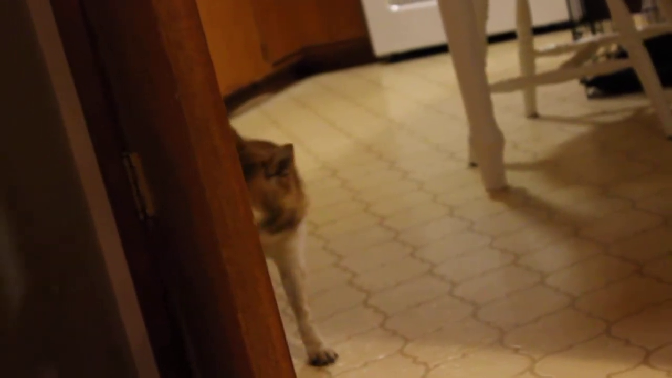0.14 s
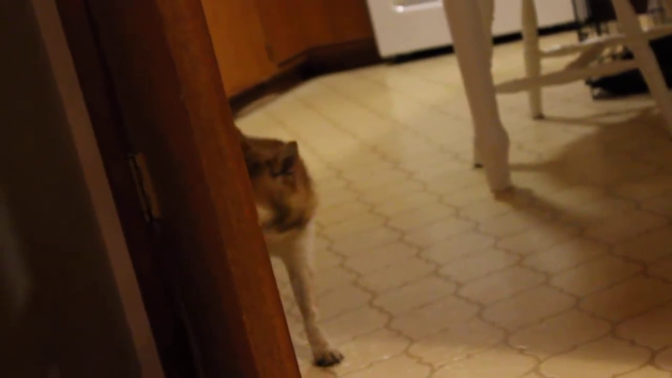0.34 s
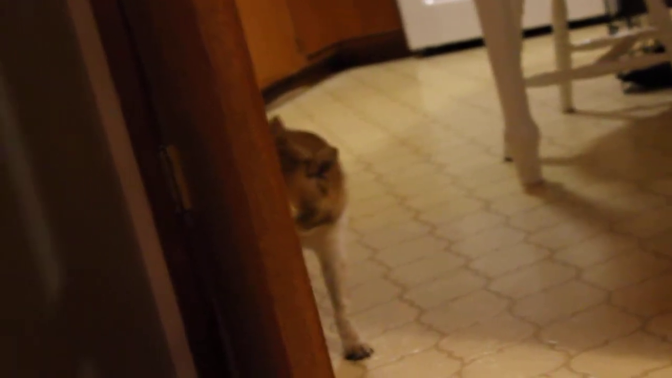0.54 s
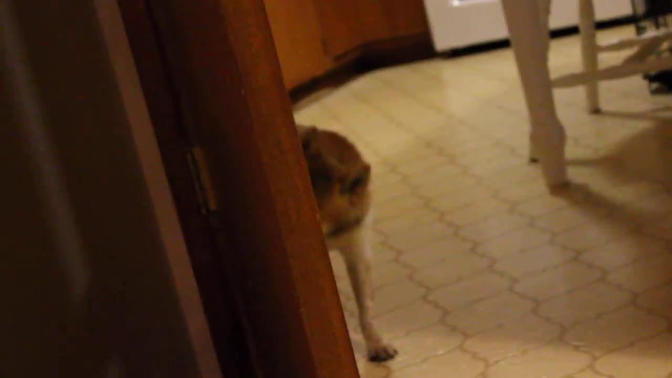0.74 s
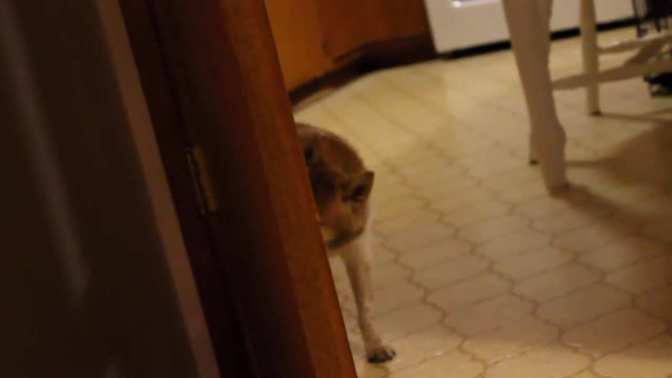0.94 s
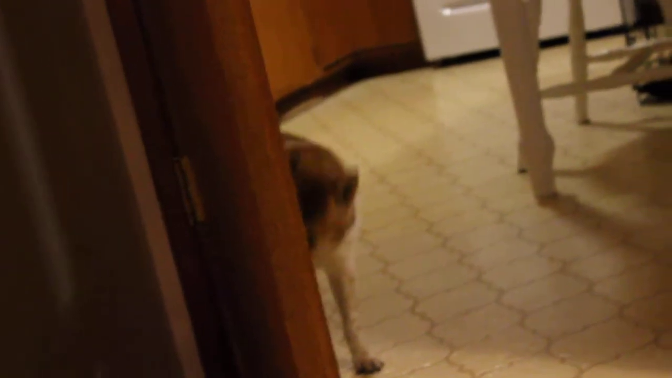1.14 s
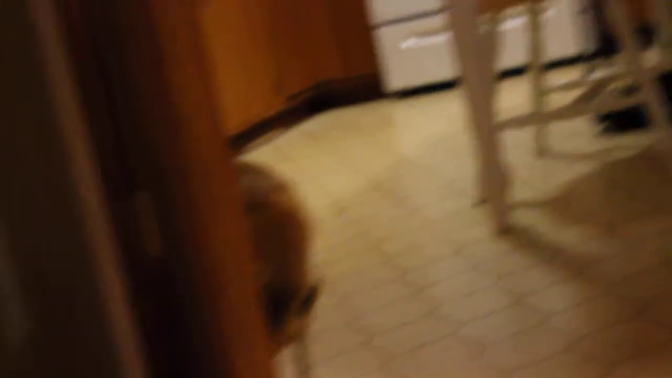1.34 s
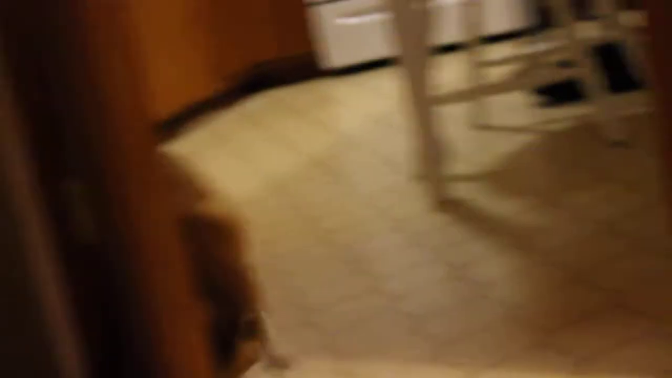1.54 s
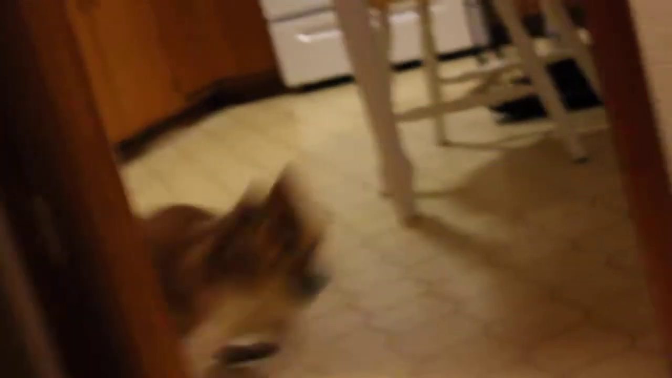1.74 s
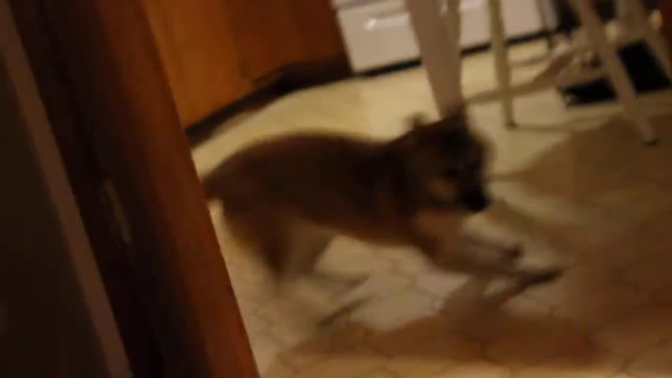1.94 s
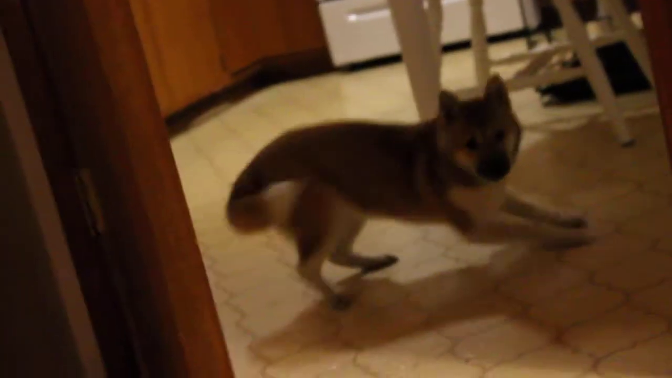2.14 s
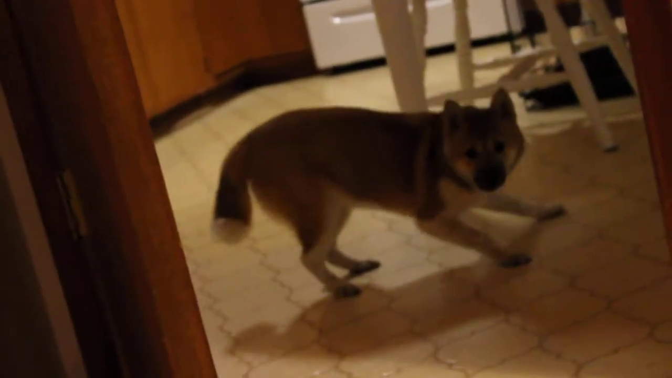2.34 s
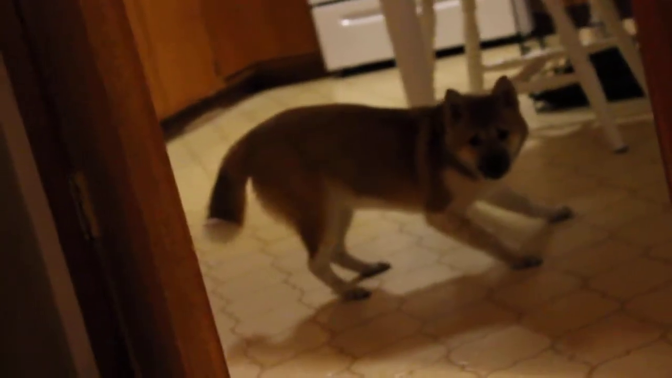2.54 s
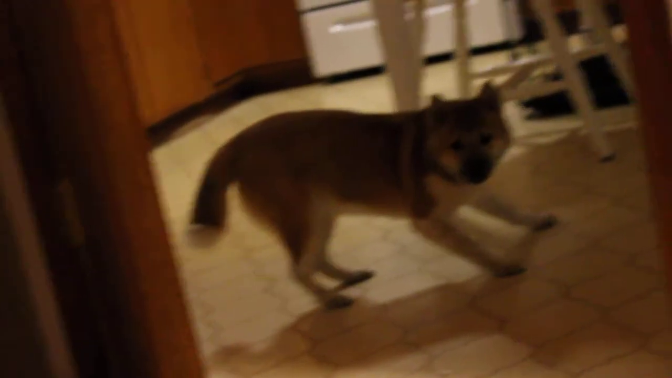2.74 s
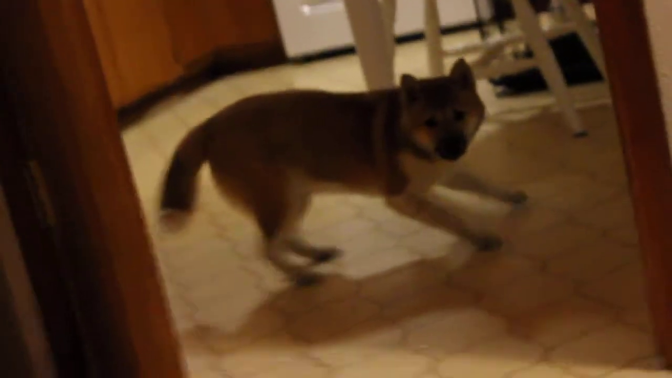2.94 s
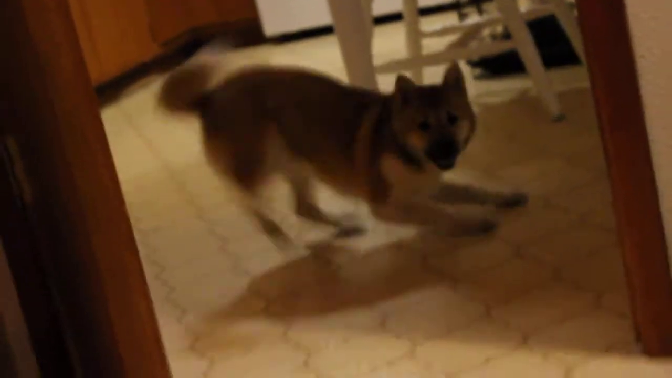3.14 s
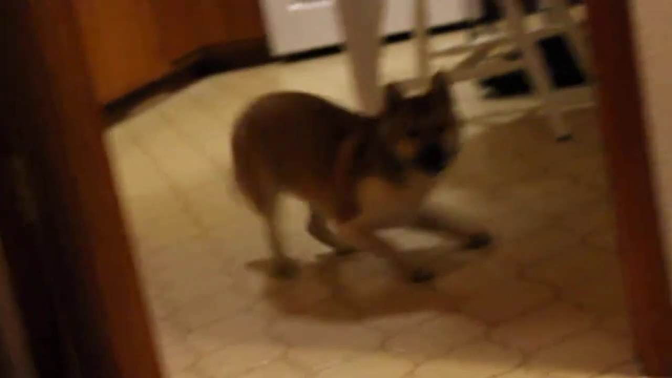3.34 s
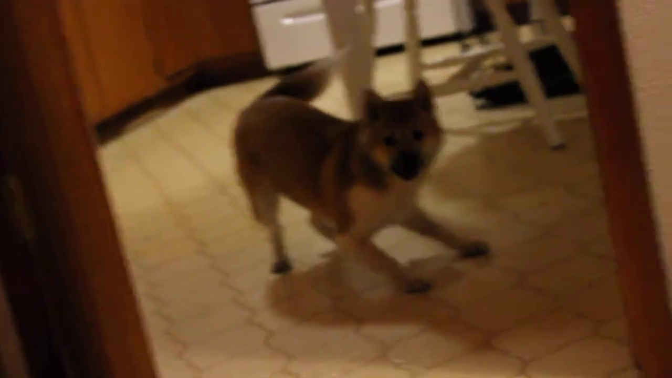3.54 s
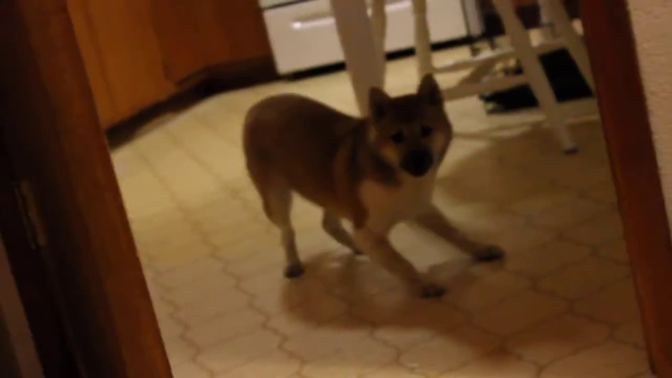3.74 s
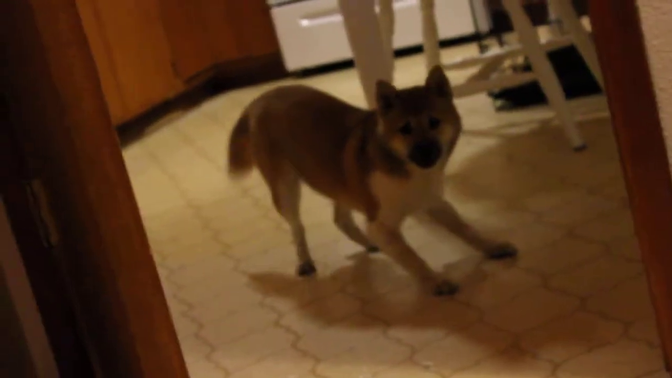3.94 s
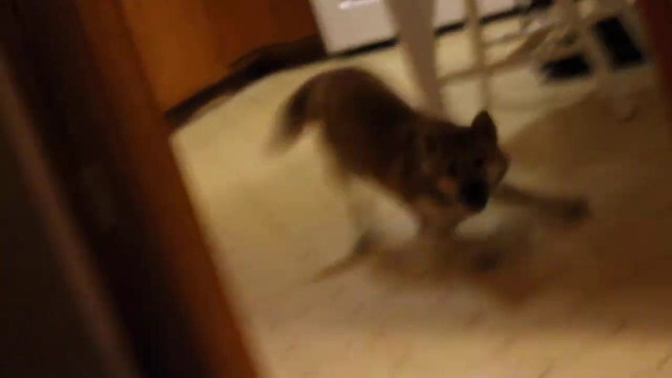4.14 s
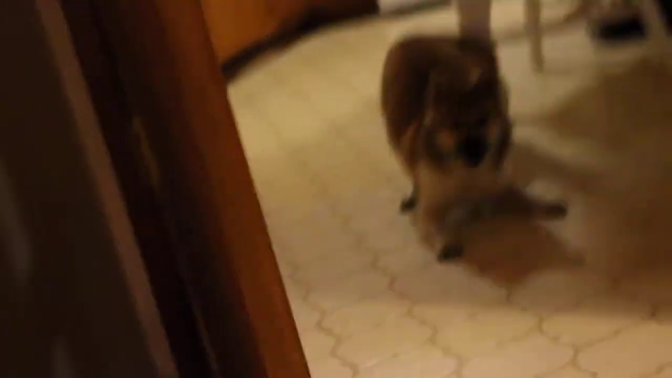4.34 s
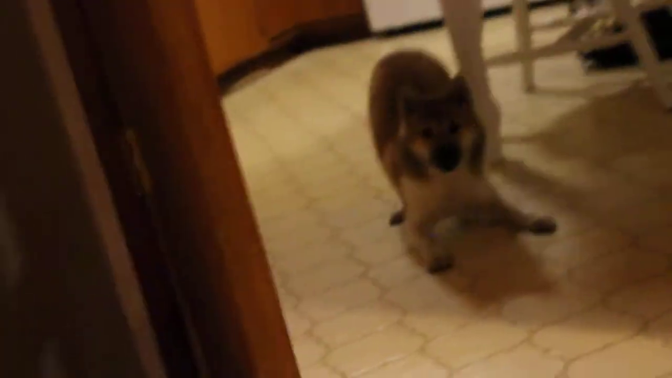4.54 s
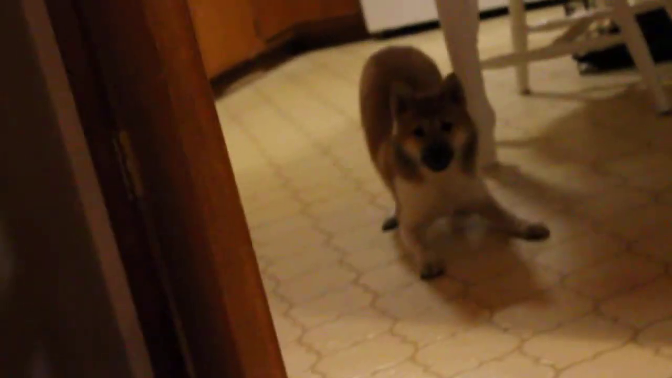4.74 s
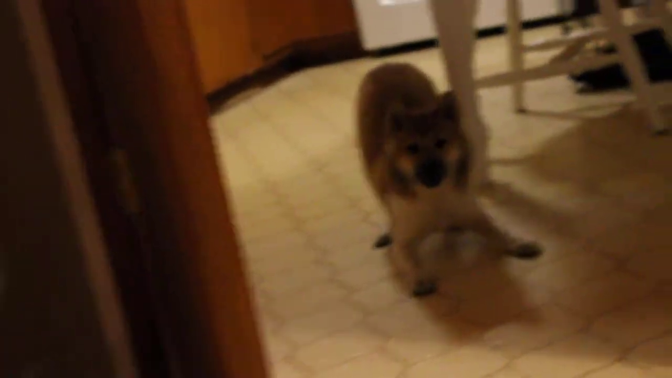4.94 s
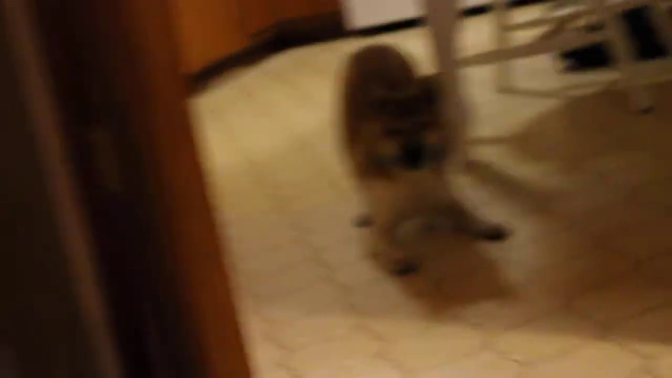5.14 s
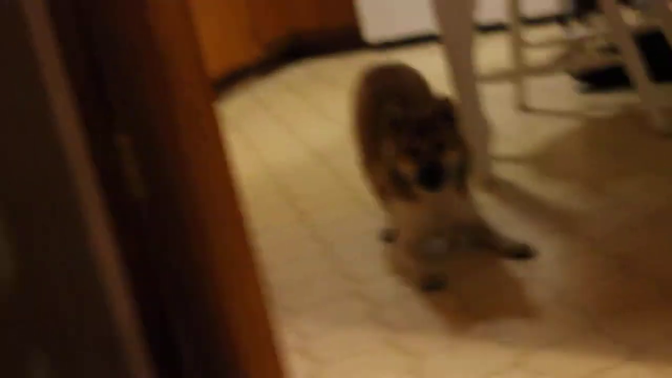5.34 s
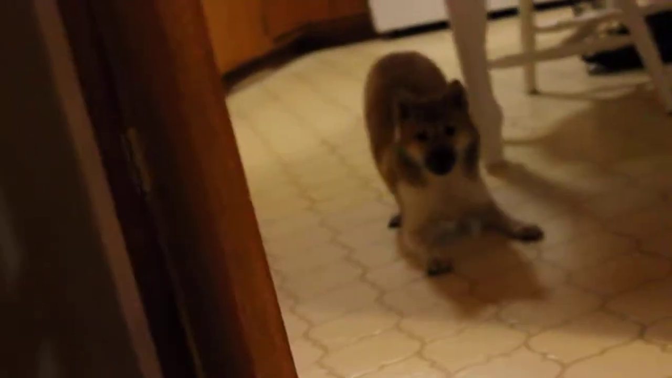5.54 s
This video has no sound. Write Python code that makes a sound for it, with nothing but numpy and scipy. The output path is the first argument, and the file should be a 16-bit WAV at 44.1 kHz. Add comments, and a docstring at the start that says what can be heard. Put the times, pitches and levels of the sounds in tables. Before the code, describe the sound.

A quiet indoor recording with soft background hiss. A dog's hard nails rattle over a smooth floor in a dense first burst, then a shorter sharp one, then a loud landing with a dull boom and scrape, and finally a weak thump with light scuffs. Bright reverberation from a bare kitchen follows each. Tiny dry ticks sound close to the microphone at the start and end.

```python
"""Over a faint steady hiss with a few close ticks, a small dog stirs, then dashes about a kitchen in four bursts.
In each, claws click as filtered impulses and skid as dense random catches on a smooth hard floor.
When it pounces or brakes, its paws thump, exciting damped modes of the boards and joists below.
The bare room answers every step: a quickly building, decaying tail with a few early echoes in it,
coloured by the furniture. One more close tick follows the last burst."""
import sys
import numpy as np
from scipy import signal
from scipy.fft import rfft, irfft, next_fast_len
from scipy.io import wavfile
from scipy.ndimage import uniform_filter1d, minimum_filter1d, map_coordinates

SR = 44100
rng = np.random.default_rng(int(sys.argv[2]) if len(sys.argv) > 2 else 0)


def transcribe(signal):
    """Save signal, clipped to [-1, 1], as a 16-bit WAV file at the path in sys.argv[1]."""
    frames = np.atleast_2d(signal).T
    limited = np.clip(frames, -1, 1)
    pcm = np.round(limited * 32767).astype(np.int16)
    wavfile.write(sys.argv[1], SR, pcm)


N = 250467

# Footfalls. Each row: start in seconds, relative peak level of the leading claw in dB, pitch in Hz,
# gap from toe to toe in seconds, relative level of the scuff in dB.
FOOTFALLS = [(1.374, -31, 4800, .0012, -58), (1.406, -35.5, 4070, .002, -59),
             (1.617, -19, 4420, 0.0056, -37), (1.637, -3, 3760, 0.0013, -23.5),
             (1.655, -13, 3560, 0.0038, -36.5), (1.68, -12, 4220, .003, -35),
             (1.693, -12, 3700, .002, -34.5), (1.743, -10.5, 3830, .002, -31),
             (1.845, -17, 5140, 0.0011, -40.5), (1.928, -7, 3500, 0.0016, -43),
             (1.947, -6, 4400, 0.007, -35), (2.030, -10.5, 4500, 0.0023, -37.5),
             (2.067, -22.5, 5600, 0.0014, -62), (2.1413, -8, 3660, .0008, -45),
             (2.2403, -13.5, 4820, 0.0021, -37.5), (2.257, -15.5, 4960, 0.0027, -47),
             (3.027, -15, 4900, 0.012, -54), (3.0681, -2, 4460, .0015, -28),
             (3.2066, -19, 4460, 0.0019, -55), (3.217, -0.5, 4740, .0009, -40),
             (3.2958, -6, 3080, .0014, -42.5), (3.340, -8.5, 3900, .002, -37),
             (3.399, -18.5, 4700, 0.0034, -40.5), (4.071, -29, 4930, 0.0061, -51),
             (4.1187, 3, 3460, 0.00092, -31), (4.196, -20.5, 4300, .002, -38),
             (4.242, -12.5, 4800, 0.0037, -38.5), (4.321, -22, 4430, .001, -41),
             (4.335, -21, 4100, 0.011, -40), (5.094, -33.5, 4250, 0.0031, -59),
             (5.132, -39, 2730, 0.0017, -43.5)]


def amp(db):
    """Level: decibels to an amplitude ratio."""
    return 10 ** (np.asarray(db) / 20)


def unit(x):
    """Normalisation: scale to rms 1."""
    return x / np.sqrt(np.mean(x ** 2) + 1e-20)


def along(points, hz):
    """Logarithmic frequency: interpolate (Hz, value) points on a log axis."""
    f, values = np.transpose(points)
    return np.interp(np.log(hz + 1), np.log(f), values)


def filtered(x, gain):
    """Linear filtering: multiply the spectrum by a gain that depends on frequency."""
    size = next_fast_len(len(x) + 8192)
    spectrum = rfft(x, size) * gain(np.fft.rfftfreq(size, 1 / SR))
    return irfft(spectrum, size)[:len(x)]


def add(track, start_s, sound):
    """Superposition: mix a sound into the track at a given time."""
    part = track[round(start_s * SR):][:len(sound)]
    part += sound[:len(part)]


def minimum_phase_pulse(spectrum, shift, size=512):
    """Minimum phase: folding the cepstrum gives the most compact causal pulse; its envelope peaks at 1."""
    hz = np.fft.rfftfreq(size, 1 / SR) / shift
    cepstrum = irfft(np.log(amp(along(spectrum, hz))))
    # fold the negative times onto the positive ones
    cepstrum[1:size // 2] *= 2
    cepstrum[size // 2 + 1:] = 0
    pulse = irfft(np.exp(rfft(cepstrum)))
    return pulse / np.abs(signal.hilbert(pulse)).max()


def damped_modes(modes, t, scatter_db=2.0, detune=0.021):
    """Modal synthesis: a blow sounds decaying sines, each strayed a little in level and pitch."""
    total = np.zeros(len(t))
    for k, (hz, db, t60) in enumerate(modes):
        stray_level, stray_pitch = rng.standard_normal(2)
        envelope = amp(db + scatter_db * stray_level - 60 * t / t60)
        sine = np.sin(2 * np.pi * hz * (1 + detune * stray_pitch) * t)
        total += (-1) ** k * envelope * sine
    return total


def claw_strikes(toes=4, loss_db=4, scatter_db=1.46, detune=0.05, uneven=0.25):
    """Successive contact: a foot rolls down toe by toe; rows of (s, dB, pitch Hz), weaker on average."""
    strikes = []
    for s, db, hz, gap, _ in FOOTFALLS:
        strikes.append((s, db, hz))
        for toe in range(1, toes):
            late, loud, high = rng.standard_normal(3)
            toe_s = s + gap * (toe + uneven * late)
            toe_db = db - loss_db * toe + scatter_db * loud
            strikes.append((toe_s, toe_db, hz * np.exp(detune * high)))
    return strikes


def claws(tick_hz=4100, chatter_db=-24, chatter_t60=0.017):
    """Impact excitation: one dry snap, then milliseconds of decaying chatter, shape a short pulse."""
    # Each row: frequency in Hz, relative level in dB, for a claw pitched at tick_hz.
    tick = [(100, -18.5), (600, -14.5), (1200, -23.5), (2000, -9.5), (2900, -1), (4000, -0.5), (5500, -3),
            (7500, -8.5), (10000, -15.5), (15000, -27.5)]
    out, t = np.zeros(N), np.arange(SR // 40) / SR
    for s, db, hz in claw_strikes():
        force = amp(chatter_db - 60 * t / chatter_t60) * rng.standard_normal(len(t))
        force[0] = 1  # the snap
        click = np.convolve(force, minimum_phase_pulse(tick, hz / tick_hz))
        add(out, s, amp(db) * click)
    return out


def wobble(rate, size):
    """Random modulation: a smooth curve through rate random points a second."""
    points = rng.standard_normal(int(size * rate / SR) + 4)
    return map_coordinates(points, [np.arange(size) * rate / SR])


def skid_strokes():
    """Friction under load: a scuff per footfall, then slides; rows of (s, length s, rise s, dB, dB/octave)."""
    # Each row: start in seconds, length in seconds, relative level in dB, brightness in dB per octave.
    slides = [(0.949, 0.043, -62, -1.5), (1.097, 0.15, -59, -2), (1.476, 0.031, -33.5, -8),
              (1.521, 0.041, -30, -1.5), (1.57, 0.067, -33.5, -5), (2.163, 0.053, -45, 1.5),
              (2.945, 0.036, -46, -10), (2.967, 0.038, -47, 2), (3.002, 0.12, -35, -2.5),
              (3.305, 0.013, -38, -6), (3.376, 0.027, -38.5, 8.5), (3.934, 0.054, -57.5, -2),
              (4.049, 0.063, -45, -5), (4.097, 0.028, -24.5, -8.5), (5.058, 0.053, -55, -2),
              (5.19, 0.091, -42, -3), (5.279, 0.066, -50, -5), (5.358, 0.065, -49.5, -5)]
    scuff_s, scuff_rise_s = 0.026, 0.0013
    strokes = []
    for s, _, hz, _, db in FOOTFALLS:
        # a higher-pitched claw scuffs brighter
        tilt = -0.5 + 13.5 * np.log2(hz / 4260)
        strokes.append((s, scuff_s, scuff_rise_s, db, tilt))
    for s, length, db, tilt in slides:
        strokes.append((s, length, 0.18 * length, db, tilt))
    return strokes


def skids(level_db=-1, catches_per_s=2600, spread_db=3, release_s=0.0055,
          judder_db=0.5, judder_rate=130, ring_db=4):
    """Stick-slip friction: a sliding claw catches at random, in dense tiny ticks of uneven size."""
    # Each row: frequency in Hz, relative level in dB.
    scratch = [(100, -1.5), (500, -7.5), (1000, -6.5), (1600, -2.5), (2400, -2), (4200, -0.5), (5500, -4),
               (8000, -5.5), (11000, -18), (16000, -35)]
    out, t = np.zeros(N), np.arange(SR // 5) / SR
    for s, length, rise, db, tilt in skid_strokes():
        catches = rng.random(len(t)) < catches_per_s / SR
        excess = np.minimum(rng.exponential(size=len(t)), 2)
        sizes = rng.choice([-1, 1], len(t)) * amp(spread_db * excess)
        sizes *= amp(judder_db * wobble(judder_rate, len(t)))
        # each stroke favours its own pitch
        claw_hz = rng.uniform(2670, 5860)

        def colour(hz):
            """Spectral envelope: scratch spectrum, tilt above 700 Hz and one resonance."""
            slope = tilt * np.log2(np.maximum(hz, 700))
            resonance = ring_db / (1 + ((hz - claw_hz) / 250) ** 2)
            return amp(along(scratch, hz) + slope + resonance)

        grit = unit(filtered(catches * sizes, colour))
        pressure = (1 - np.exp(-t / rise)) * np.exp(-np.maximum(t - length, 0) / release_s)
        add(out, s, amp(db + level_db) * pressure * grit)
    return out


def paws(level_db=-3, contact_s=0.0029, slap_db=3, slap_t60=0.11):
    """Structural resonance: a soft pad slaps the surface and sets boards and joists booming."""
    # Landings. Each row: start in seconds, relative level in dB, weight on the joists in dB,
    # relative slap of the pad in dB.
    landings = [(0.275, -54.5, -14, -15), (1.483, -22.5, 6, -1.5), (1.497, -23, -4, 4.5),
                (1.638, -40, -6, -5), (1.751, -34.5, -3, 9), (2.062, -41.5, 0, -2), (2.262, -41, -6, -1.5),
                (3.069, -25.5, -13, 5.5), (3.217, -26.5, -11, 2.5), (4.092, -18.5, -2, 2),
                (4.104, -14, -11.5, 3), (5.14, -33.5, 3.5, 2), (5.331, -51, 12, -13)]
    # Low modes of the joists, then modes of the boards between them.
    # Each row: frequency in Hz, relative level in dB, t60 in seconds.
    joist_modes = [(37, -10, .45), (62, -7, .3), (79, -6, .25), (91, -2, .28)]
    board_modes = [(108, -6, .18), (132, 0, .3), (148, -1, .2), (165, -7, .15), (197, -3, .27),
                   (214, -7, .26), (242, -9, .2), (285, -10, .15), (328, -15, .22), (390, -18, .2),
                   (417, -16, .25), (599, -22, .3)]
    # Spectrum of the slap. Each row: frequency in Hz, relative level in dB.
    pad = [(35, -49), (80, -3), (160, 2.5), (280, -4.5), (500, -17.5), (1000, -28.5), (2500, -35),
           (8000, -53)]
    out, t = np.zeros(N), np.arange(SR * 3 // 4) / SR
    for s, db, weight_db, pad_db in landings:
        boom = damped_modes(board_modes, t) + amp(weight_db) * damped_modes(joist_modes, t)
        slap = unit(filtered(rng.standard_normal(len(t)), lambda hz: amp(along(pad, hz))))
        slap *= amp(pad_db + slap_db - 60 * t / slap_t60)
        onset = 1 - np.exp(-t / contact_s)
        add(out, s, amp(db + level_db) * onset * (boom + slap))
    return out


def room_response(tail_db=-5.5, echo_db=-31.5, build_s=0.0018, count=8):
    """Reverberation: a quickly building, decaying diffuse tail with a few early echoes in it."""
    # Each row: frequency in Hz, t60 in seconds.
    decay_t60 = [(100, .4), (300, .5), (1000, .5), (4000, .48), (8000, .43), (15000, .32)]
    # Each row: frequency in Hz, relative level in dB.
    tone = [(60, -17), (200, -10), (600, -2), (1500, 0), (2200, 0), (4000, 0), (8000, 0), (15000, -3)]
    hz, t, z = signal.stft(rng.standard_normal(SR * 3 // 4), SR, nperseg=256)
    z = z * amp(along(tone, hz)[:, None] - 60 * t / along(decay_t60, hz)[:, None])
    tail = signal.istft(z, SR, nperseg=256)[1]
    tail *= 1 - np.exp(-np.arange(len(tail)) / SR / build_s)
    response = amp(tail_db) * tail / np.linalg.norm(tail)
    # early echoes off cabinets and door frame
    delays_s = rng.uniform(0.0032, 0.02, count)
    response[(delays_s * SR).astype(int)] += amp(echo_db) * rng.standard_normal(count)
    return response


def room(x, count=36):
    """Time-varying convolution: the echo pattern is redrawn at regular intervals, so the answer keeps varying."""
    out, hop = np.zeros(N), N // count
    padded = np.pad(x, (0, 2 * hop))
    # overlapping pieces keep constant power, as their responses are independent
    fade = np.sqrt(signal.windows.hann(2 * hop, sym=False))
    for start in range(0, N - hop, hop):
        piece = padded[start:start + 2 * hop] * fade
        add(out, start / SR, signal.fftconvolve(piece, room_response()))
    return out


def cabinets(hz):
    """Sympathetic resonance: furniture favours a few narrow frequencies in the room's answer."""
    # Each row: centre frequency in Hz, bandwidth in Hz, relative level in dB.
    resonances = [(1300, 16, -33), (1500, 60, -8.5), (1526, 130, -8), (2330, 26, -29), (2450, 15, -18),
                  (2697, 16, 5.5), (3370, 33, -28), (3780, 53, -15), (4430, 45, -11), (4820, 47, -21),
                  (5250, 44, -21)]
    gain = 1
    for centre, width, db in resonances:
        gain = gain + amp(db) * 1j * hz * width / (centre ** 2 - hz ** 2 + 1j * hz * width)
    return gain


def close_ticks(level_db=-5):
    """Direct sound: faint ticks of a small hard body, short damped modes without room echo."""
    # Each row: start in seconds, relative level in dB.
    ticks = [(0.091, -38), (.192, -43), (0.498, -40.5), (1.060, -42), (5.468, -40)]
    # Each row: frequency in Hz, relative level in dB, t60 in seconds.
    body_modes = [(5260, -12, 0.012), (6470, -11, 0.02), (7560, -14, 0.017), (10450, -9, 0.012)]
    out, t = np.zeros(N), np.arange(SR // 20) / SR
    for s, db in ticks:
        add(out, s, amp(db + level_db) * damped_modes(body_modes, t))
    return out


def background(level_db=-59.5):
    """Stationary noise: the steady hiss of a quiet house is spectrally shaped white noise."""
    # Each row: frequency in Hz, relative level in dB.
    hiss = [(25, -53), (60, -8.5), (130, -4), (260, 2.5), (500, -3), (900, -3.5), (1400, -4.5),
            (2500, -8.5), (4500, -11.5), (6800, -15.5), (7900, -14.5), (8800, -17.5), (12000, -22.5),
            (16000, -23)]
    return amp(level_db) * unit(filtered(rng.standard_normal(N), lambda hz: amp(along(hiss, hz))))


def scene():
    """Superposition: the dog's feet, the room's answer, the close ticks and the hiss."""
    feet = claws() + skids() + paws()
    echoes = filtered(room(feet), cabinets)
    return (feet + echoes + close_ticks() + background())[None]


def record(dry, ceiling=0.71, size=45, low_hz=27.0, top_hz=16000):
    """Limiting and band-limiting: soften the sharpest peaks, drop the deepest bass and the top."""
    needed = np.minimum(1, ceiling / (np.abs(dry) + 1e-9))
    # hold and smooth the gain over size samples, about a millisecond
    limited = dry * uniform_filter1d(minimum_filter1d(needed, size), size)

    def band(hz):
        """Band-pass: a smooth low cut and a sharp top edge."""
        return (hz < top_hz) * hz ** 4 / (hz ** 4 + low_hz ** 4)

    return np.array([filtered(channel, band) for channel in limited])


dry = scene()
out = record(dry)
transcribe(out)
```